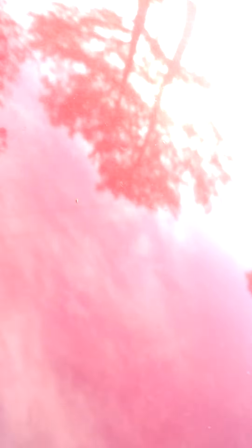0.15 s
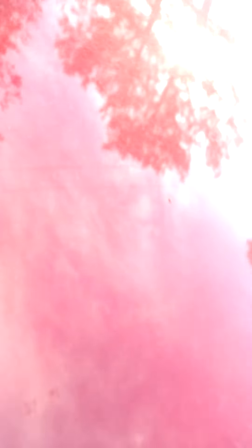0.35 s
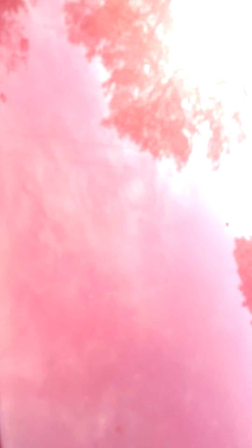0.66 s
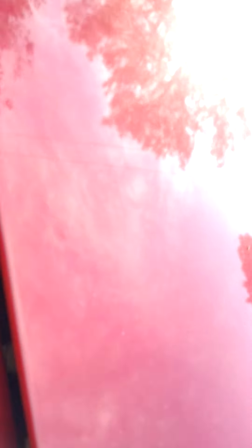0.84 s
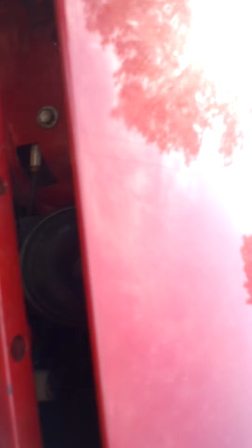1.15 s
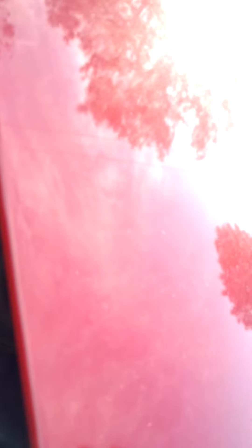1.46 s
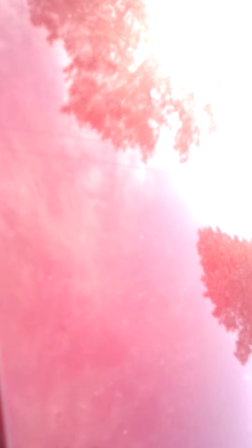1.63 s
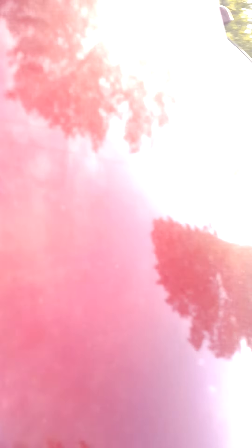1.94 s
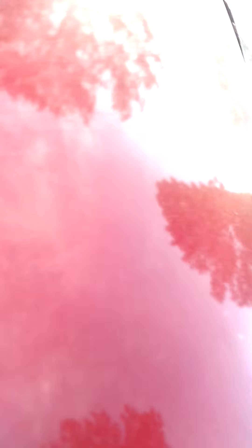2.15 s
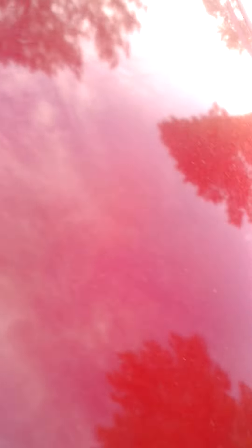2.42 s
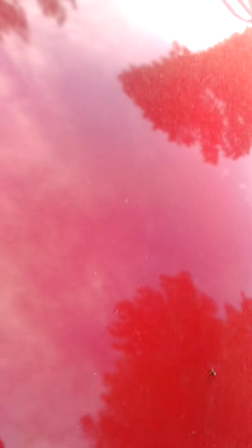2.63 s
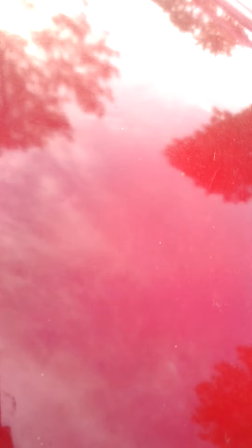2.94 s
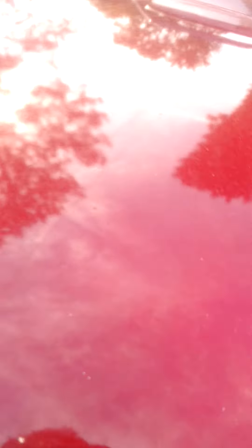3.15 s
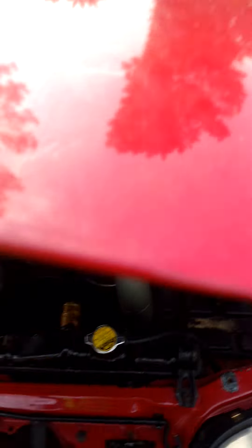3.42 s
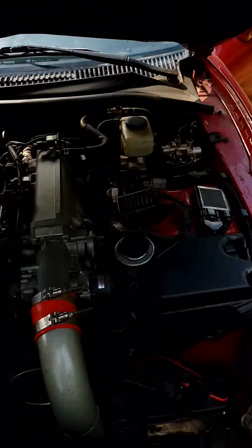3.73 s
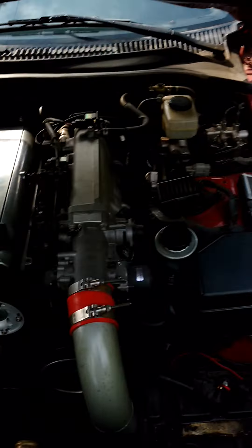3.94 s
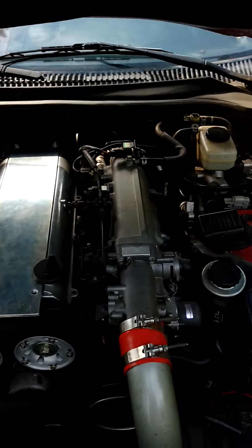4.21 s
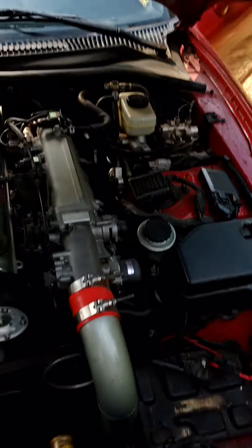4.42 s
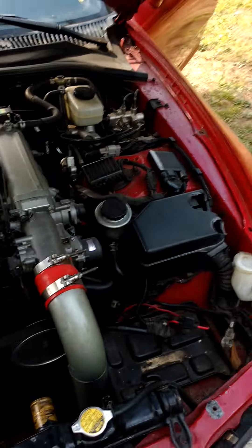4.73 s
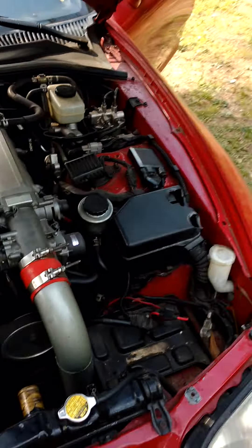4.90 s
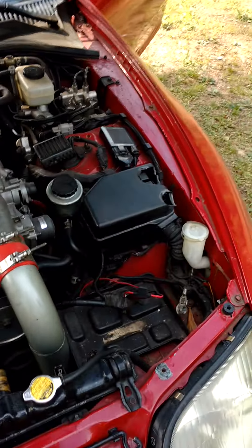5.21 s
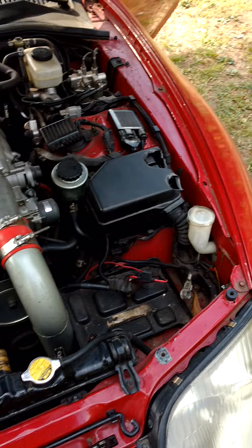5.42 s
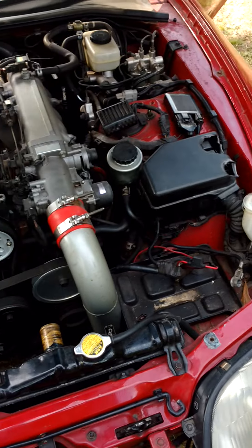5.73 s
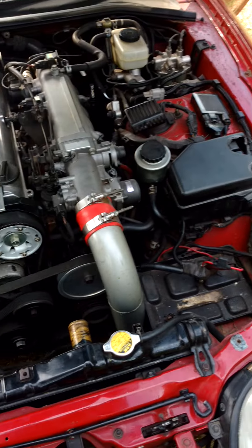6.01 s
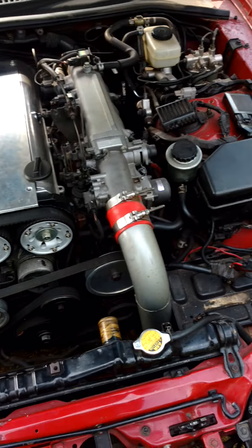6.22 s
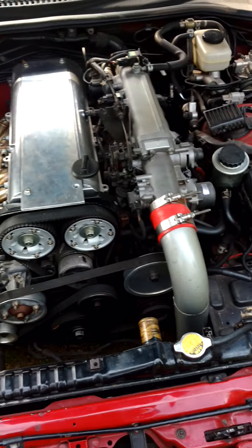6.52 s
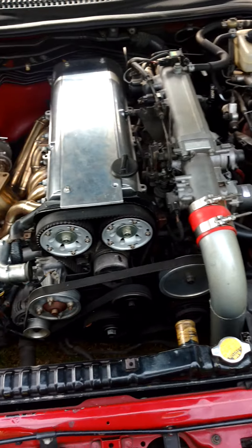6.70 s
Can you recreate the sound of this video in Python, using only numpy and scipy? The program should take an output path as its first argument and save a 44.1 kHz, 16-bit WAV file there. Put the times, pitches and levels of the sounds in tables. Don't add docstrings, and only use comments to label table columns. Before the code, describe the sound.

Close by a car outdoors, small bright metal clicks and a short scrape come first, with faint hinge squeaks. A dense burst of hard latch clacks and hollow panel knocks follows, then softer thuds and rattles as the hood is lifted and propped. Wind buffets the handheld phone microphone; insects and far traffic hum behind, with a sharp late snap and two faint bird calls.

```python
import sys
import numpy as np
from scipy import signal
from scipy.fft import rfft, irfft, next_fast_len
from scipy.io import wavfile
from scipy.ndimage import map_coordinates

SR = 44100
rng = np.random.default_rng(int(sys.argv[2]) if len(sys.argv) > 2 else 0)


def inscribe(sig):
    pcm = np.round(np.clip(np.atleast_2d(sig).T, -1, 1) * 32767)
    wavfile.write(sys.argv[1], SR, pcm.astype(np.int16))


def volts_from_db(level):
    exponent = np.asarray(level, float) / 20
    return 10 ** exponent


N = 302448

# [f/Hz, level/dB, t60/s]
PANEL_MODES = [(143, -0.5, 0.21), (189, -11, 0.13), (221, 4.5, 0.071), (225.6, -9, 0.45), (273.2, -2, 0.11),
               (310, 3, 0.079), (353.2, 0, 0.088), (408, -1, 0.12), (457, 0, 0.054), (504, 2, 0.09),
               (559, 3, 0.049), (667, -6.5, 0.19)]
# [f/Hz, level/dB, t60/s]
BRACKET_MODES = [(801, -14, 0.066), (890, -1, 0.027), (1131, -2.5, 0.008), (1303, -2.5, 0.022),
                 (1657, -20.5, 0.046), (1837, -6.5, 0.071), (2011, -12.5, 0.13)]
# [f/Hz, level/dB per Hz]
KNOCK_COLOUR = [(400, -29.5), (750, 3), (1300, -1), (2100, -4.5), (3000, -33)]
CLICK_COLOUR = [(1500, -22.5), (2500, 4.5), (3600, -2.5), (5000, -8), (7000, -30)]
TICK_COLOUR = [(3000, -25), (4500, -1.5), (6000, -1.5), (7500, -3), (10000, -34)]
SNAP_COLOUR = [(6000, -30.5), (8000, -8.5), (10500, -10), (13000, -12), (15300, -11.5), (15900, -35.5)]
# [t/s, peak level/dB, centre f/Hz]
HELD_BLOWS = [(.135, -50, 692), (0.336, -39, 680), (.953, -34.5, 408), (1.069, -18, 243.6),
              (1.0694, -19.5, 550), (1.158, -27, 338), (1.174, -9, 310), (1.189, -15.5, 335.4),
              (1.228, -14.5, 330), (1.268, -22.5, 270), (1.332, -21.5, 330), (1.344, -24, 241),
              (1.7, -43.5, 293), (1.739, -40, 280), (1.772, -28.5, 275), (2.246, -43, 282),
              (2.349, -19, 150), (2.392, -31.5, 149)]
# [t/s, peak level/dB, centre f/Hz]
FREE_BLOWS = [(2.587, -32.5, 313), (2.69, -36, 340), (2.725, -27, 475), (2.799, -38, 338),
              (2.941, -11, 225), (3.2751, -20, 225), (3.355, -40, 284), (3.461, -46.5, 407),
              (3.573, -35.5, 221), (3.998, -37.5, 415), (4.03, -26, 506), (4.051, -23.5, 125),
              (4.102, -29, 418), (4.165, -34.5, 292), (4.555, -29, 440), (4.579, -27, 414),
              (5.831, -36.5, 237)]


def unit(x):
    return x / np.sqrt(np.mean(x ** 2, axis=-1, keepdims=True) + 1e-20)


def along(points, hz):
    f, db = np.transpose(points)
    return volts_from_db(np.interp(np.log(hz + 1), np.log(f + 1), db))


def curve(points):
    s, value = np.transpose(points)
    return np.interp(np.arange(N) / SR, s, value)


def wobble(rate, size=N):
    knots = rng.standard_normal(int(size * rate / SR) + 4)
    return map_coordinates(knots, [np.arange(size) * rate / SR])


def filtered(x, response):
    m = next_fast_len(N + 8192)
    return irfft(rfft(x, m) * response(np.fft.rfftfreq(m, 1 / SR)), m)[..., :N]


def noise(spectrum):
    return unit(filtered(rng.standard_normal((2, N)), lambda hz: along(spectrum, hz)))


def resonant(x):
    # [f/Hz, width/Hz, level/dB]
    steel = [(2720, 350, -6), (3410, 3200, 7.5), (5400, 1100, 4), (7000, 720, 7), (9180, 880, 1),
             (11960, 1400, -5.5), (14700, 1200, -8)]

    def response(f):
        return 0.13 + sum(volts_from_db(db) / (1 + (2 * (f - hz) / width) ** 2) for hz, width, db in steel)
    return unit(filtered(x, response))


def tilted(modes, db_per_octave):
    lowest_hz = modes[0][0]
    return [(hz, db + db_per_octave * np.log2(hz / lowest_hz), t60) for hz, db, t60 in modes]


def ring(modes, t, luck, scatter_db):
    hz, db, t60 = np.transpose(modes)[:, :, None]
    strength = volts_from_db(scatter_db * luck[:2 * len(modes)].reshape(2, -1))
    decay = volts_from_db(db - 60 * t / t60)
    return strength @ (decay * np.sin(2 * np.pi * hz * t)) / np.linalg.norm(volts_from_db(db))


def tone(track, partials, flutter_db, waver):
    s, hz, db = np.transpose(track)
    at = np.arange(int(s[0] * SR), min(int(s[-1] * SR), N))
    pitch = np.interp(at / SR, s, hz) * (1 + waver * wobble(90, size=len(at)))
    phase = 2 * np.pi * np.cumsum(pitch) / SR
    out = np.zeros((2, N))
    for multiple, level in partials:
        flutter = flutter_db * np.array([wobble(39, size=len(at)), wobble(40, size=len(at))])
        out[:, at] += volts_from_db(np.interp(at / SR, s, db) + level + flutter) * np.sin(multiple * phase)
    return out


def stroke(s, rise_s, fall_s, db):
    t = np.arange(N) / SR - s
    return volts_from_db(db - 15 * np.maximum(-t / max(rise_s, .003), t / max(fall_s, .003)))


def background():
    # [f/Hz, level/dB per Hz]
    air_colour = [(30, 9), (100, 29), (200, 19.5), (400, 16.5), (800, 8.5), (1500, 6.5), (3000, 5),
                  (5000, 1.5), (8000, 1), (11000, -9.5), (15200, -10.5), (15700, -34.5)]
    # [f/Hz, width/Hz, level/dB]
    insects = [
        (6500, 200, 0),
        (6950, 450, 0),
        (7450, 400, -3),
    ]
    t = np.arange(N) / SR
    duck = np.interp(t, np.cumsum([1, 0.53, 0.27, 1.48]), [0, 1, 1, 0])
    air_db = -68 + 20 - 15 * duck
    air = volts_from_db(air_db + 1.4 * wobble(5.3) + 1.4 * wobble(15)) * noise(air_colour)
    choirs = []
    for hz, width, db in insects:
        band = [(hz - width, -30), (hz, 0), (hz + width, -30)]
        choirs.append(volts_from_db(db + 2.5 * wobble(25)) * noise(band))
    choirs[-1] = choirs[-1] * volts_from_db(4.5 * np.sin(2 * np.pi * 23.4 * t))
    shade_db = 1.5 * (t < 3.3)
    return air + volts_from_db(-60.5 + 1.5 - 21 * duck - shade_db) * sum(choirs)


def bird():
    # [t/s, length/s, top f/Hz, level/dB]
    calls = [
        (5.99, 0.2, 862, -60),
        (6.344, 0.21, 851, -57),
    ]
    # [multiple of the pitch, level/dB]
    throat = [(2, -9), (3, 5), (4, -2), (7, -15)]
    attack_s, release_s, sag_hz_per_s, edge_db = 0.026, 0.0686, 180, 1
    out = 0
    for s, size, hz, db in calls:
        late = size - release_s
        track = [(s, hz - sag_hz_per_s * attack_s, db - edge_db),
                 (s + attack_s, hz, db),
                 (s + late, hz - sag_hz_per_s * late, db + 8),
                 (s + size, hz - sag_hz_per_s * size - 45, db - edge_db)]
        out = out + tone(track, throat, flutter_db=3, waver=0.01)
    return out


def wind():
    # [t/s, level/dB]
    gusts = [
        (0.0, -83),
        (1.03, -61),
        (1.3, -78.5),
        (1.68, -81),
        (2.45, -72),
        (2.58, -84),
        (3.63, -58.5),
        (3.93, -56),
        (4.35, -64),
        (6.86, -69),
    ]
    # [t/s, level/dB, f/Hz]
    bumps = [
        (3.736, -12, 84),
        (3.763, -19, 70),
        (3.842, -24, 99),
        (3.876, -18, 119),
        (3.962, -7, 118),
        (4.018, -13, 99),
        (5.021, -28, 70),
    ]
    # [f/Hz, level/dB per Hz]
    buffet_colour = [(20, -28.5), (60, -1.5), (120, -1.5), (250, -15), (500, -67)]
    shake_db, shake_t60_s = -38.5, 0.5
    t = np.arange(N) / SR
    slaps = 0
    for s, db, hz in bumps:
        pulse = np.exp(-((t - s) * hz * 2.7) ** 2)
        slaps = slaps - volts_from_db(db) * np.cos(2 * np.pi * hz * (t - s) + 1.1) * pulse
    blows = [(s, db - 1) for s, db, _ in HELD_BLOWS] + [(s, db) for s, db, _ in FREE_BLOWS]
    shaken = sum((t > s) * volts_from_db(db + shake_db - 60 * np.abs(t - s) / shake_t60_s) for s, db in blows)
    buffet = unit(volts_from_db(2 * wobble(7.4)) * noise(buffet_colour))
    both, apart = (volts_from_db(curve(gusts)) + shaken) * volts_from_db(16) * buffet
    return both + 0.29 * apart * np.array([[1], [-1]]) + slaps * np.array([[.9], [-.1]])


def creak():
    # [t/s, length/s, first f/Hz, last f/Hz, level/dB]
    slips = [(0.408, 0.078, 1024, 1404, -50), (0.471, 0.063, 1400, 1324, -58),
             (.65, 0.044, 1400, 1390, -61), (0.689, 0.04, 1250, 1270, -57), (0.744, 0.054, 1400, 1400, -58),
             (0.769, .05, 1250, 1250, -55.5), (.865, 0.06, 1900, 2100, -54), (.915, .07, 2050, 1890, -55),
             (1.004, 0.066, 1220, 1445, -54.5), (1.386, 0.28, 1290, 1302, -74.5),
             (6.039, 0.12, 1423, 1410, -61.5), (6.169, .1, 1350, 1250, -63.5),
             (6.27, 0.07, 1420, 1300, -65.5), (6.33, 0.086, 1230, 1200, -64.5),
             (6.479, 0.081, 1400, 1355, -59.5), (6.56, 0.06, 1250, 1136, -63.5),
             (6.659, 0.13, 1300, 1230, -61.5), (6.729, .09, 1380, 1400, -58),
             (6.798, 0.061, 1300, 1410, -63)]
    edge_s, edge_db = 0.025, 6
    out = 0
    for s, size, first_hz, last_hz, db in slips:
        end = s + size
        track = [(s, first_hz, db - edge_db), (s + edge_s, first_hz, db),
                 (end - edge_s, last_hz, db), (end, last_hz, db - edge_db)]
        out = out + tone(track, [(1, 5), (1.07, -2.5)], flutter_db=3.5, waver=0.02)
    return out


def rubs():
    # [t of most force/s, rise/s, fall/s, bracket level/dB, panel over bracket level/dB]
    scrapes = [(.158, 0.059, 0.13, -68, -10), (0.418, 0.014, 0.16, -42.5, -5), (.96, 0.16, 0.1, -47, -5.5),
               (1.165, 0.04, 0.03, -24, 0.5), (1.25, 0.0058, 0.058, -36, 2.5),
               (2.159, 0.0173, 0.22, -59, -14), (2.577, 0.024, 0.016, -58, 12),
               (2.612, 0.016, 0.041, -45, 3), (2.696, 0.0089, 0.048, -32.5, -24),
               (2.73, 0.036, .12, -48, 8), (3.05, 0.27, 0.43, -55.5, 3), (3.305, .006, 0.036, -76, 11),
               (3.606, 0.2, 0.46, -48, -3), (4.09, 0.05, 0.49, -48.5, -1), (4.306, 0.16, 0.038, -53.5, 3.5),
               (4.834, 0.057, 0.69, -64.5, 8.5), (5.37, 0.092, 0.28, -50, -10),
               (6.601, 0.56, 0.54, -70, -4)]
    # [t of most
    # force/s, rise/s, fall/s, level/dB]
    rustles = [(.02, 0.11, 0.12, -44), (0.251, 0.088, 0.016, -47), (0.422, 0.078, 0.13, -41),
               (0.798, 0.063, 0.12, -40), (1.19, 0.029, 0.011, -35), (1.206, 0.0038, 0.023, -31.5),
               (1.28, .03, 0.017, -56.5), (2.048, 0.1, 0.061, -57), (2.157, 0.01, 0.11, -55),
               (3.416, 0.085, 0.43, -53), (4.306, 0.26, 0.13, -51.5), (4.75, 0.061, 0.31, -47),
               (5.119, 0.094, 0.038, -44), (6.371, 0.014, 0.89, -61.5), (6.82, 0.025, 0.046, -45.5)]
    # [f/Hz, level/dB per Hz]
    thud_colour = [(60, -30.5), (130, 3.5), (250, 4.5), (500, -5.5), (750, -20.5), (1200, -62)]

    def grit():
        return volts_from_db(2.3 * wobble(200) + 2.66 * wobble(40))

    forces = [stroke(*row[:-1]) for row in scrapes]
    force = sum(forces)
    push = sum(f * volts_from_db(row[-1]) for f, row in zip(forces, scrapes))
    panel = unit(grit() * noise(thud_colour)) * push * volts_from_db(8.5)
    bracket = unit(grit() * noise(KNOCK_COLOUR)) * force * volts_from_db(-2)
    rasp = volts_from_db(-10) * force + sum(stroke(*row) for row in rustles)
    bright = noise(CLICK_COLOUR) + noise(TICK_COLOUR) + 0.99 * noise(SNAP_COLOUR)
    hiss = unit(grit() * bright) * rasp * volts_from_db(-1)
    return panel + bracket + hiss


def taps():
    # [t/s, peak level/dB, centre f/Hz]
    touches = [(.075, -43, 1180), (.45, -36.5, 300), (.515, -46, 850), (.655, -39, 300),
               (1.0695, -19.5, 590), (1.138, -21, 420), (1.155, -25, 1000), (1.168, -18, 1230),
               (1.191, -20, 350), (1.2291, -15, 1085), (1.271, -30, 298), (2.347, -32.5, 750),
               (2.528, -48.5, 870), (2.537, -53, 880), (2.571, -35, 260), (2.573, -48, 850),
               (2.601, -39, 840), (2.626, -41, 860), (2.689, -43, 900), (2.727, -31, 480),
               (2.761, -37.5, 940), (2.777, -42, 700), (2.79, -41, 850), (2.801, -39, 890),
               (2.837, -46, 320), (2.864, -47, 280), (2.874, -47, 900), (3.092, -52, 1500),
               (3.13, -52, 1700), (3.177, -44.5, 1500), (3.228, -42, 624), (3.262, -31, 1330),
               (3.355, -38, 1250), (4.011, -37, 900), (4.032, -21, 1280), (4.056, -27.5, 1100),
               (4.11, -31, 900), (4.122, -40, 1290), (4.145, -39, 600), (4.268, -41, 320),
               (4.288, -43, 1350), (4.317, -43, 348), (5.846, -37, 250), (2.944, -12, 237),
               (3.278, -13, 234), (3.273, -27, 900), (.556, -34, 1160), (0.726, -35.5, 1160),
               (4.033, -23, 500), (2.805, -40, 400), (2.351, -19, 149), (1.229, -24, 526),
               (5.937, -36, 1650), (5.938, -50, 1100), (1.773, -31.5, 490), (1.18, -22, 560),
               (3.29, -33, 480)]
    t = np.arange(SR // 12) / SR
    out = np.zeros((2, N + len(t)))
    modes = PANEL_MODES + BRACKET_MODES
    lucks = rng.standard_normal((len(touches), 2 * len(modes)))
    for (s, db, centre_hz), luck in zip(touches, lucks):
        woken = [(hz, -33.5 * np.log2(hz / centre_hz) ** 2, 0.028 + 10 / hz) for hz, _, _ in modes]
        attack = 1 - np.exp(-t * centre_hz / 0.45)
        out[:, round(s * SR):][:, :len(t)] += volts_from_db(db + 3) * ring(woken, t, luck, scatter_db=2.5) * attack
    return out[:, :N]


def thuds():
    # [t/s, peak level/dB, centre f/Hz]
    more_free_blows = [
        (2.957, -33, 510),
        (3.29, -27, 510),
        (3.9, -40, 200),
        (4.6, -40, 130),
        (4.045, -27.5, 230),
    ]
    t = np.arange(SR // 4) / SR
    out = np.zeros((2, N + len(t)))
    blows = [(*row, 0.64, 0.059) for row in HELD_BLOWS]
    blows += [(*row, 0.79, 1) for row in FREE_BLOWS + more_free_blows]
    attack = (1 - np.exp(-t / 0.0021)) ** 2
    lucks = rng.standard_normal((len(blows), 2 * len(PANEL_MODES)))
    for (s, db, centre_hz, share, longest_s), luck in zip(blows, lucks):
        woken = [(hz, level - 21 * np.log2(hz / centre_hz) ** 2, min(t60 * share, longest_s))
                 for hz, level, t60 in PANEL_MODES]
        out[:, round(s * SR):][:, :len(t)] += volts_from_db(db + 9.5) * ring(woken, t, luck, scatter_db=5) * attack
    return out[:, :N] * volts_from_db(1.3 * wobble(70))


def hits():
    # [t/s, peak level/dB, bracket knock level/dB, rattle t60/s]
    clip_hits = [
        (.0709, -43.5, -4, 0.25),
        (5.5567, -48.5, -14, 0.1),
        (5.7094, -37.5, -12, 0.1),
        (5.936, -23.5, -41, 0.083),
        (6.46, -50, -9, 0.11),
        (6.635, -64, -15, 0.047),
    ]
    key_hits = [(.0014, -28.5, -28, 0.12), (.14, -47.5, 10.5, 0.085), (.5555, -19, -23, 0.094),
                (.5568, -29.5, -45, 0.37), (.7265, -17, -31, 0.13), (.9545, -28.5, -18.5, 0.028),
                (.9862, -31.5, -17, 0.021), (1.2894, -39, -1, 0.042), (3.356, -43.5, 5.5, 0.1),
                (3.7348, -37, -9, 0.021), (4.0601, -36, 9, 0.031), (4.4221, -38.5, -23, 0.022),
                (4.8382, -41.5, 0, 0.062), (5.953, -38, -40, 0.11), (5.9726, -35.5, -18, 0.3),
                (6.8136, -42, -6.5, 0.13)]
    catch_hits = [(.2566, -21, -19, 0.077), (.3395, -23.5, -13, 0.11), (1.1006, -38, -9, 0.035),
                  (1.134, -30, -20, 0.27), (1.1985, -1, -24, 0.024), (1.2289, -11.5, -2, 0.047),
                  (1.2699, -38.5, 8, 0.06), (1.3327, -6, -15, 0.038), (1.6997, -67.5, 14, 0.072),
                  (1.737, -56.5, 7, 0.47), (2.146, -46, -7, .11), (2.2453, -66, 17.5, 0.099),
                  (2.5285, -68.5, 17.5, 0.038), (2.759, -49, 12, 0.017), (2.7999, -62, 10, 0.042),
                  (3.991, -46.5, 9.5, 0.24), (4.589, -42, -2, 0.091)]
    padded_hits = [(1.0705, -42.5, 20.5, 0.061), (1.1654, -14.5, -6, 0.086), (1.1754, -10, -10, 0.18),
                   (1.3431, -12.5, -7.5, 0.061), (1.7732, -14, -13.5, 0.028), (2.3459, -40, 6.5, 0.069),
                   (2.396, -43.5, -2.5, 0.077), (2.587, -18, -8.5, 0.037), (2.688, -36, -5, 0.34),
                   (2.7228, -24.5, 1.5, .058), (2.7444, -27.5, 4, 0.02), (2.9385, -30, 8, 0.069),
                   (3.2612, -35, 7, 0.096), (3.274, -27.5, 7, 0.032), (3.567, -45, 1, 0.043),
                   (4.031, -23, -2.5, 0.083), (4.102, -35, 2, 0.14), (4.114, -37, -1, 0.34),
                   (4.5551, -26, -4.5, 0.1), (4.574, -35, 2.5, 0.1)]
    # [f/Hz, level/dB, t60/s]
    clip_modes = [(2050, -6.5, 0.2), (3553, -40, 5.0), (5900, -14, 0.16), (6390, 1.5, 0.13),
                  (9000, -12, 0.1), (8600, -19, 0.055), (9500, -7.5, 0.12), (10110, -29, 0.12)]
    key_modes = [(1156, -5.5, 0.06), (3400, -17, 0.13), (3720, -8, 0.042), (4240, -19, 0.053),
                 (5580, -4, 0.052), (8400, -10, .084), (8540, -9, 0.039), (9300, -14, .095)]
    catch_modes = [(3000, -14.5, 0.24), (4100, -17.5, 0.039), (4030, -12, 0.12), (5740, -18, 0.18),
                   (6430, -5.5, 0.016), (8629, -25.5, 0.28), (9340, -26.5, 0.15), (10770, -25.5, 0.17)]
    latch_modes = [(2220, -2, 0.11), (3010, 1, 0.12), (3580, -13, 0.065), (3740, -13.5, 0.043),
                   (5060, 1.5, 0.091), (6080, 1, 0.062), (7200, -4, 0.045), (8500, -0.5, 0.021)]
    kinds = [(clip_hits, 3.5, clip_modes, 2.5),
             (key_hits, -1.5, key_modes, -4),
             (catch_hits, -12, catch_modes, -6.5),
             (padded_hits, -21.5, tilted(latch_modes, -3.4), -11.5)]
    contacts = [(*row, *part) for table, *part in kinds for row in table]

    t = np.arange(SR // 6) / SR
    out = np.zeros((2, N + len(t)))
    chatter = volts_from_db(2 * wobble(300))
    colours = [noise(KNOCK_COLOUR)]
    colours += [resonant(noise(c)) for c in (CLICK_COLOUR, TICK_COLOUR, SNAP_COLOUR)]
    rattles = [np.pad(c * chatter, ((0, 0), (0, len(t)))) for c in colours]
    attack = 1 - np.exp(-t / 0.00041)
    yard = volts_from_db(-20.5 - 60 * t / 0.089)
    lucks = rng.standard_normal((len(contacts), 2, 2 * len(latch_modes)))
    for (s, db, knock_db, t60, snap_db, modes, ring_db), luck in zip(contacts, lucks):
        at = slice(round(s * SR), round(s * SR) + len(t))
        crack = volts_from_db(1.2 * db + 12.5 - 60 * t / 0.0036)
        burst = volts_from_db(-60 * t / max(t60, .01)) + crack + yard
        knock, click, tick, snap = (r[:, at] * burst for r in rattles)
        damped = volts_from_db(-25 * t / max(t60, .01))
        dulled = tilted(BRACKET_MODES, -.45 * max(knock_db, -14))
        bracket = 0.5 * damped * ring(dulled, t, luck[0], scatter_db=4) + 0.38 * knock
        latch = volts_from_db(ring_db) * damped * ring(modes, t, luck[1], scatter_db=-7.5)
        rattle = 0.47 * click + 0.8 * volts_from_db(0.61 * snap_db) * tick + 0.89 * volts_from_db(snap_db) * snap
        out[:, at] += volts_from_db(db - 4.5) * (volts_from_db(knock_db + 5) * bracket + latch + rattle) * attack
    return out[:, :N]


def ports(pair, apart, shade=0.14):
    difference = filtered(pair[1] - shade * pair[0], lambda hz: along(apart, hz))
    return pair[0] + np.array([[1], [-1]]) * difference


def turned(pair):
    # [t/s, lag/ms]
    facing = [(0, -0.085), (.4, -0.043), (.6, -0.022), (1.1, -0.015), (1.4, -0.024), (1.8, 0.072),
              (2.15, 0.072), (2.4, -0.0079), (2.7, -0.042), (2.95, 0.08), (3.4, -0.027), (3.9, .06),
              (4.05, 0.29), (4.6, 0.23), (5, 0.08), (5.6, 0.0032), (5.95, -0.17), (6.86, 0)]
    half = curve(facing) * SR / 2000
    moved = [map_coordinates(x, [np.arange(N) + side * half], mode="nearest") for x, side in zip(pair, (1, -1))]
    return np.array(moved)


def scene():
    # [f/Hz, level/dB]
    far_apart = [(50, -23.5), (200, -8), (500, -6), (1200, 2), (3000, 1), (15000, -2)]
    near_apart = [(50, -27), (200, -19), (500, -7), (1000, -4), (3000, -0.5), (15000, 0)]
    car = hits() + thuds() + rubs() + creak() + taps()
    around = ports(background() + bird(), far_apart) + wind()
    return turned(ports(car, near_apart)) + around


def top_cut(x):
    return signal.sosfilt(signal.butter(12, 16080, fs=SR, output="sos"), x)


def record(dry):
    # [f/Hz, level/dB]
    cross = [(2500, -0.1), (5000, -1.9), (7500, -7.5), (10000, 2), (12500, -0.5), (15000, -16)]
    # [f/Hz, level/dB]
    roll_off = [(14300, 0), (14900, -0.5), (15300, -13.5), (16000, -23.5)]
    cross_hz, low_cut_hz, top_hz = 2474, 24, 16000
    late = filtered(dry[::-1], lambda hz: along(cross, hz) * np.exp(-2j * np.pi * hz / cross_hz))
    hiss = volts_from_db(-78) * noise([(2800, -17.5), (3500, -6.5), (12000, -8.5), (15300, 0), (15600, -45)])

    def microphone(hz):
        low_cut = 1j * hz / (low_cut_hz + 1j * hz)
        return (hz < top_hz) * along(roll_off, hz) * low_cut

    wide = filtered(.5 * (dry - late) + hiss, microphone)
    mix = np.clip(wide, -1, 1)
    return top_cut(mix)


dry = scene()
out = record(dry)
inscribe(out)
```